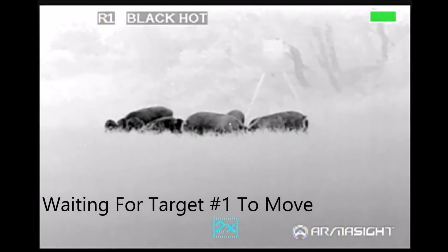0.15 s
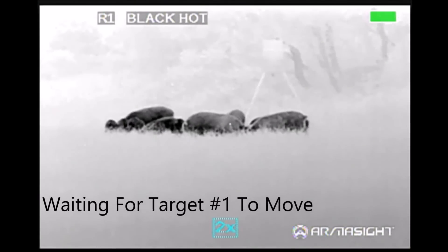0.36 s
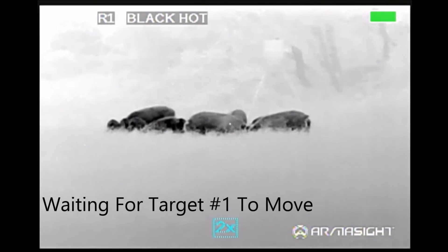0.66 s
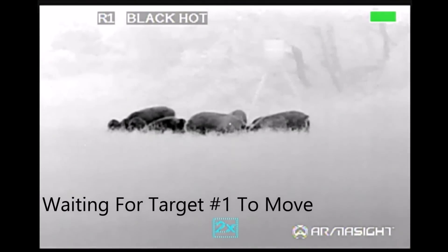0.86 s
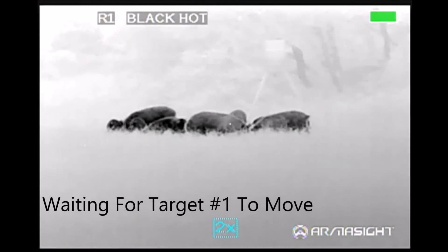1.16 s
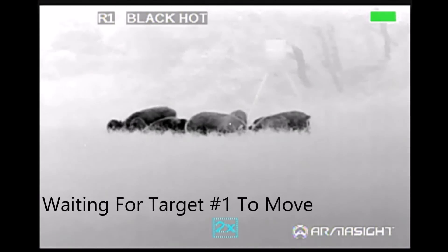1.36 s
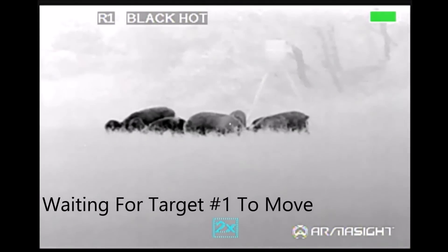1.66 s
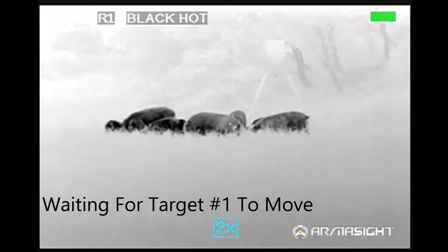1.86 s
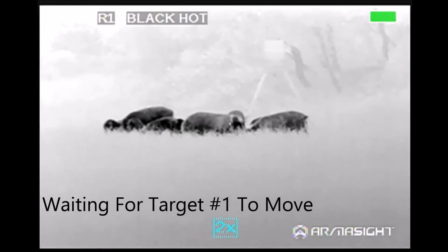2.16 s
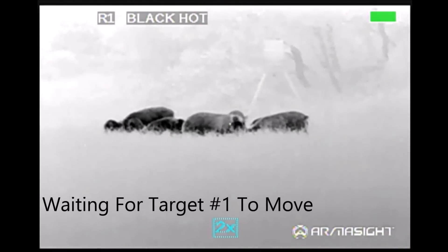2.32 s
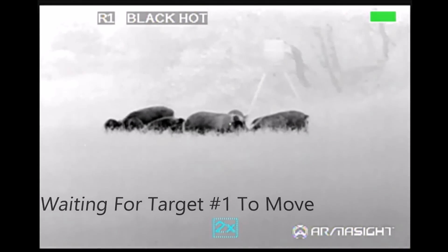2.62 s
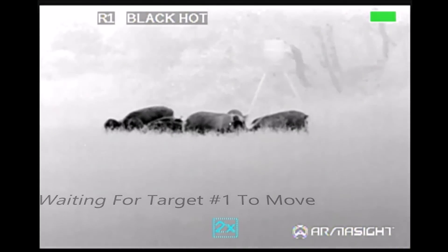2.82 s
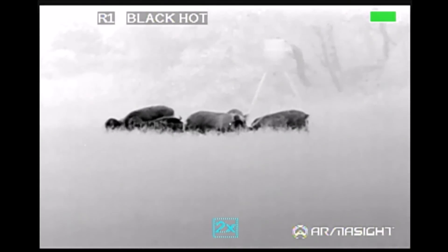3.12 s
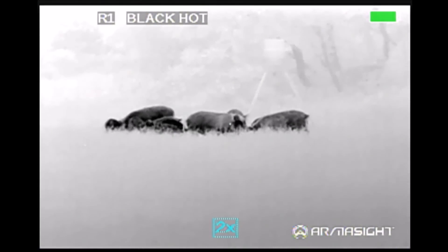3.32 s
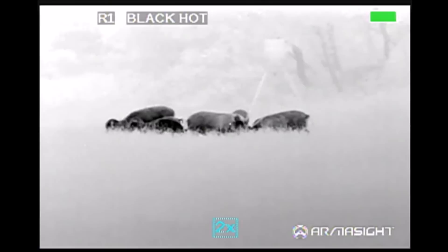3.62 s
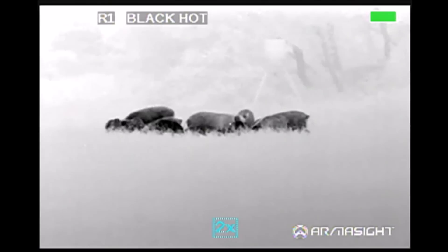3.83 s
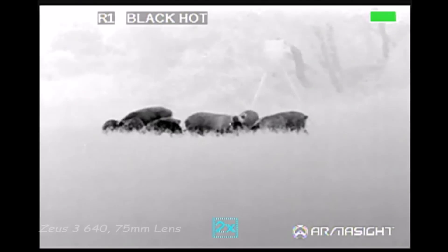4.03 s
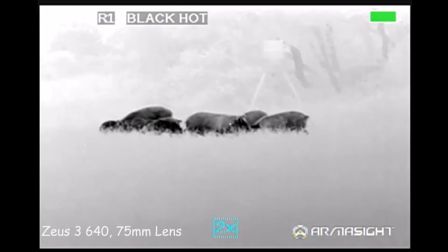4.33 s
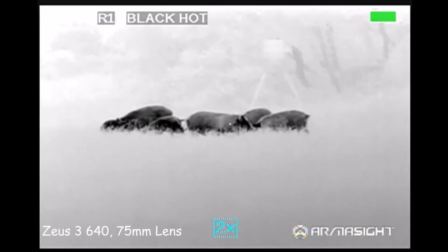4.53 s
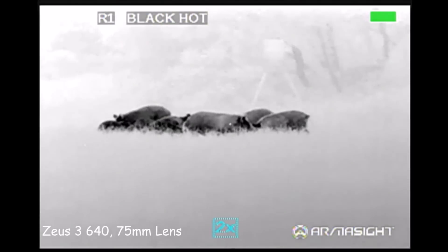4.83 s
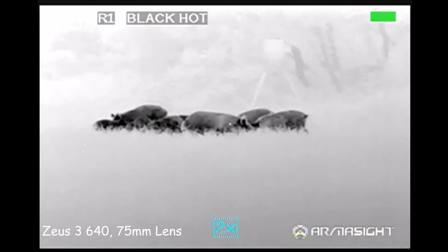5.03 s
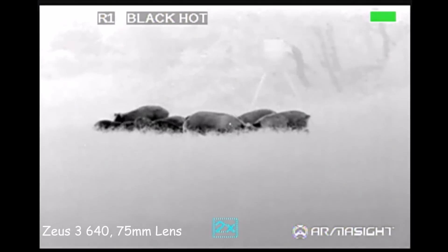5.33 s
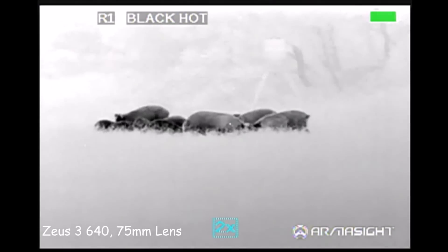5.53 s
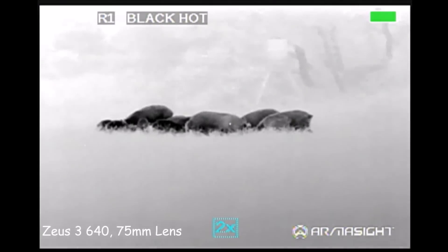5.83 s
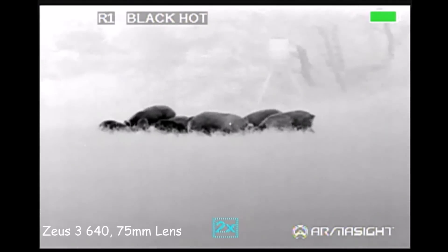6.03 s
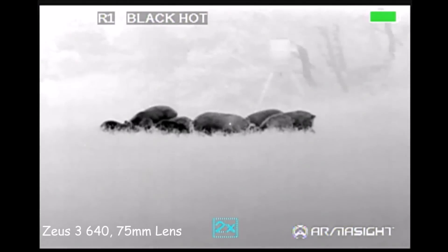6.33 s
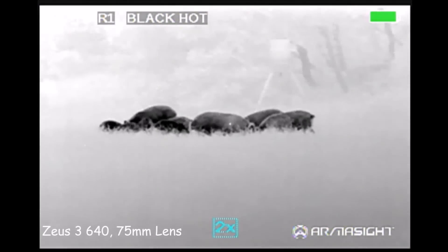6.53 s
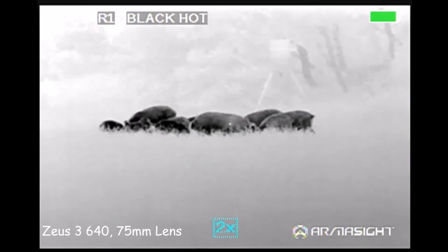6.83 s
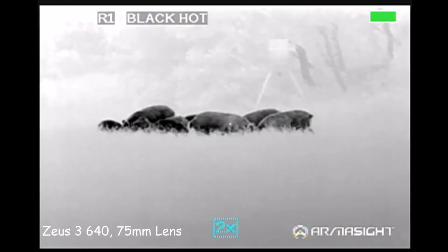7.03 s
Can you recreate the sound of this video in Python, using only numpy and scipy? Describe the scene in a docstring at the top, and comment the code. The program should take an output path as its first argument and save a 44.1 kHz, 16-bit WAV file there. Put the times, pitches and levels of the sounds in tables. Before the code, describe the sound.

High insect trills fill a field at night: a near cricket pulses in repeated bursts, a fainter one stutters behind it, and a lower one trills without a break. Low wind buffeting and a faraway engine hum run underneath with a light hiss. A faint rustle and tap come near the start, then a few soft clicks and knocks by the microphone midway, while the crickets carry on.

```python
"""Crickets sing at night in an open field: a tree cricket trills steadily, two ground crickets, one near
and one far, in broken trills. Each sings by stridulation: a scraper runs over a file of teeth and drives
a wing resonance. Wind buffets the microphone, far engines hum, and a few small taps and rustles fall
over the amplifier's hiss. The recorder ticks faintly as it loses samples."""
import sys
import numpy as np
from scipy import signal
from scipy.fft import rfft, irfft
from scipy.io import wavfile
from scipy.ndimage import uniform_filter1d

SR = 44100
rng = np.random.default_rng(int(sys.argv[2]) if len(sys.argv) > 2 else 0)


def file_out(sig):
    """Save sig as 16-bit WAV at sys.argv[1]."""
    # one column per channel
    cols = np.atleast_2d(sig).T
    # limit, then scale
    lim = np.clip(cols, -1, 1)
    pcm = np.round(lim * 32767).astype(np.int16)
    wavfile.write(sys.argv[1], SR, pcm)


N = 316197


def gain_of(db):
    """Amplitude ratio of a level in decibels."""
    return 10 ** (np.asarray(db) / 20)


def unit_rms(x):
    """Normalisation to a mean power of 1."""
    return x / np.sqrt(np.mean(abs(x) ** 2) + 1e-20)


def curves(rows):
    """Linear interpolation of a time table's columns, sample by sample."""
    times, *columns = np.transpose(rows)
    return [np.interp(np.arange(N) / SR, times, column) for column in columns]


def coloured_noise(spectrum):
    """Spectral shaping of white noise, rms 1."""
    corner_hz, db = np.transpose(spectrum)
    hz = np.fft.rfftfreq(N, 1 / SR)
    shape = gain_of(np.interp(np.log(hz + 1), np.log(corner_hz + 1), db, right=-120))
    return unit_rms(irfft(rfft(rng.standard_normal(N)) * shape, N))


def wander(width_hz):
    """Slow random modulation: complex noise with a Gaussian spectrum, rms 1."""
    hz = np.fft.fftfreq(N, 1 / SR)
    return unit_rms(np.fft.ifft(np.exp(2j * np.pi * rng.random(N) - 2 * (hz / width_hz) ** 2)))


def add(mix, start_s, sound):
    """Superposition of a sound on the mix, cut to fit."""
    at = round(start_s * SR)
    part = mix[max(at, 0):][:len(sound) + min(at, 0)]
    part += sound[max(-at, 0):][:len(part)]


def hiss():
    """Broadband noise of the amplifier and rumble of far air, with slight amplitude modulation."""
    # noise spectrum: frequency_hz, relative_density_db
    spectrum = [(30, 2), (60, 9.5), (110, 6.5), (190, -1), (330, -2.5), (700, -8), (1500, -12), (2700, -15),
                (5600, -17), (9800, -19.5), (10500, -23.5), (11200, -48)]
    return gain_of(-41 + 1.04 * wander(54).real) * coloured_noise(spectrum)


def engines():
    """Far tones whose phase and amplitude drift as they propagate through the air."""
    # two strongest tones: time_s, lower_level_db, upper_level_db
    hum_levels = [(0.0, -51, -48), (0.18, -57, -44.5), (0.68, -46.5, -62), (0.96, -61, -55),
                  (1.14, -40, -43.5), (1.76, -45, -45), (2.0, -47, -38.5), (2.21, -51, -54),
                  (2.66, -38, -44.5), (2.91, -50, -54), (3.15, -41, -67), (3.51, -46, -43),
                  (3.75, -35, -47), (3.93, -44.5, -46), (4.47, -42, -40), (6.07, -46, -41.5),
                  (7.05, -48, -58), (7.17, -61, -56)]
    # weaker narrowband tones: pitch_hz, width_hz, level_db
    drone_bands = [(40.4, 2.1, -48), (69.3, 1.5, -60), (76, 3.9, -46), (108.5, 5.2, -57), (124, 2.3, -58.5),
                   (137.3, 2.2, -59), (140.7, 0.79, -56), (164, 2.2, -59.5)]
    t = np.arange(N) / SR
    hum = sum(gain_of(db) * np.sqrt(2) * np.sin(2 * np.pi * hz * t + 0.89 * wander(0.81).real)
              for hz, db in zip((73, 82.8), curves(hum_levels)))
    drones = sum(gain_of(db) * np.sqrt(2) * (wander(width_hz) * np.exp(2j * np.pi * hz * t)).real
                 for hz, width_hz, db in drone_bands)
    return hum + drones


def wind():
    """Low-frequency pressure fluctuations on the microphone, swelling in gusts."""
    # gust envelope: time_s, level_db
    gusts = [(0.0, -36.5), (0.3, -36), (0.5, -28.5), (1.72, -36.5), (1.78, -28.5), (2.6, -29),
             (2.85, -42.5), (3.24, -30.5), (3.3, -40), (4.13, -32.5), (4.47, -39.5), (5.45, -28.5),
             (5.47, -36), (6.15, -31), (6.23, -38.5), (7.17, -32.5)]
    # pressure spectrum: frequency_hz, relative_density_db
    buffet = [(2, -28), (6, -10.5), (12, -0.5), (30, -7.5), (55, -16.5), (80, -26.5), (150, -42.5)]
    flutter_db = 1.5 * wander(5.7).real
    return gain_of(curves(gusts)[0] + flutter_db) * coloured_noise(buffet)


def rustles():
    """Friction noise: brief soft brushes of cloth or grass."""
    # brushes: start_s, length_s, level_db
    brushes = [(0.315, .04, -45), (6.62, .08, -50)]
    out = np.zeros(N)
    noise = coloured_noise([(200, -20), (400, 6), (1000, 2), (3000, -14), (5000, -30)])
    for start_s, length_s, db in brushes:
        size = round(length_s * SR)
        add(out, start_s, gain_of(db) * np.hanning(size) * noise[round(start_s * SR):][:size])
    return out


def taps():
    """Damped oscillation: small dull knocks near the microphone, each ringing in one or a few modes."""
    # one row per mode, each with a soft onset: start_s, peak_db, pitch_hz, rise_s, t60_s
    modes = [(0.346, -41, 3290, .002, .05), (0.992, -35, 400, .002, .028), (3.2785, -32, 1220, .0006, .014),
             (3.457, -33.5, 1300, .0006, .014), (3.703, -35.5, 760, .006, .06),
             (3.708, -45, 910, .005, .05), (3.706, -43, 480, .005, .05), (3.780, -39.5, 550, .004, .04),
             (3.784, -45, 1150, .003, .04)]
    out, t = np.zeros(N), np.arange(SR // 8) / SR
    for start_s, db, hz, rise_s, t60_s in modes:
        envelope = gain_of(-60 * t / t60_s) * (1 - np.exp(-t / rise_s))
        add(out, start_s, gain_of(db) * envelope / envelope.max() * np.sin(2 * np.pi * hz * t))
    return out


def grass_scattering(song, t60_s=.1, tail_db=-13):
    """Scattering by grass and brush turns part of a song's power into a short diffuse tail."""
    t = np.arange(SR // 5) / SR
    response = rng.standard_normal(len(t)) * gain_of(-60 * t / t60_s)
    tail = unit_rms(signal.oaconvolve(song, response)[:N])
    return unit_rms(unit_rms(song) + gain_of(tail_db) * tail) * np.std(song)


def wing_stroke(start_hz, end_hz, bend, rise_s, fall_s, ring_hz, width_hz, direct_gain):
    """Forced resonance: ever slower tooth strikes drive the wing, which beats with them and rings on."""
    t = np.arange(-rise_s, fall_s + 0.019, 1 / SR)
    swell = np.cos(np.pi / 2 * np.clip(np.where(t < 0, -t / rise_s, t / fall_s), 0, 1))
    progress = np.clip((t + rise_s) / (rise_s + fall_s), 0, 1)
    tooth_hz = start_hz + (end_hz - start_hz) * progress ** bend
    drive = swell * np.exp(2j * np.pi * np.cumsum(tooth_hz) / SR)
    radius = np.exp(-np.pi * width_hz / SR)
    ring = signal.lfilter([1 - radius], [1, -radius * np.exp(2j * np.pi * ring_hz / SR)], drive)
    sound = ring + direct_gain * drive
    power = uniform_filter1d(abs(sound) ** 2, size=200)
    return sound * np.sqrt(2 / power.max()), power.argmax() / SR


def stridulation(times, levels, wing, spread_db, jitter_s, detune):
    """A pulse train of wing strokes, no two quite alike, the stronger gliding lower."""
    out = np.zeros(N)
    start_hz, end_hz, *shape = wing
    for time_s, db in zip(times, levels):
        louder, later, phase, start_shift, end_shift = rng.standard_normal(5)
        deeper = .003 * (db - np.mean(levels))
        sound, peak_s = wing_stroke(start_hz * (1 + detune * start_shift),
                                    end_hz * (1 + detune * end_shift - deeper), *shape)
        pulse = gain_of(db + spread_db * louder) * (sound * np.exp(10j * phase)).real
        add(out, time_s - peak_s + jitter_s * later, pulse)
    return out


def run_times(first_s, last_s, count, period_s, drag_power):
    """Nearly periodic strokes that drag towards the end; a higher power delays the drag."""
    k = np.arange(count)
    drag_s = last_s - first_s - period_s * k[-1]
    return first_s + period_s * k + drag_s * (k / k[-1]) ** drag_power


def far_cricket(wing, warmup_db=-6, brush_db=-10):
    """Stuttering stridulation: after a full stroke the scraper may only brush the file."""
    # trills: first_s, last_s, stroke_count, warmup_count, stutter_from_s, stutter_to_s, level_db
    trills = [(0.0054, 0.8636, 60, 0, 0, 0.18, -47.5), (1.052, 1.7672, 50, 7, 1.27, 1.46, -48.3),
              (1.908, 2.19, 21, 5, 0, 0, -50.2), (3.6271, 4.1007, 33, 0, 3.66, 3.94, -48.3),
              (4.2742, 4.6412, 26, 1, 4.29, 4.47, -47.3), (4.785, 5.4626, 48, 5, 4.97, 5.28, -47.5),
              (5.651, 6.2289, 41, 1, 5.92, 6.04, -47), (6.3412, 7.1531, 57, 1, 6.41, 6.64, -47)]
    times, levels = [], []
    for first_s, last_s, count, warmup, stutter_from_s, stutter_to_s, db in trills:
        brushed = True  # so the first stroke is never brushed
        for k, time_s in enumerate(run_times(first_s, last_s, count, period_s=.0141, drag_power=4)):
            chance = .7 if stutter_from_s < time_s < stutter_to_s else .13
            brushed = rng.random() < chance and not brushed
            times.append(time_s)
            levels.append(db + warmup_db * (k < warmup) + brush_db * brushed)
    return stridulation(times, levels, wing, spread_db=1.2, jitter_s=.0006, detune=.011)


def near_cricket(wing, pause_s=.0245, warmup_db=-10, swell_db=-4.5, brush_db=-12):
    """Stridulation in bursts: a lone stroke, a pause, weak warm-up strokes, then a swelling run."""
    # trills: opening_s, last_s, run_count, warmup_count, period_s, drag_power, opening_db, full_db
    trills = [(0.2065, 0.3951, 12, 1, .01385, 8, -43, -43), (0.7399, 1.2759, 37, 6, .01372, 8, -48, -41.5),
              (1.5388, 2.3413, 56, 1, .01385, 8, -47.5, -41.5),
              (2.5612, 3.2413, 47, 1, .01378, 8, -44.5, -41.5),
              (3.6894, 3.966, 19, 3, .01385, 8, -46, -41.5), (4.3785, 4.9403, 39, 5, .01385, 8, -48, -42),
              (5.1806, 6.037, 59, 2, .01383, 4, -45.5, -41),
              (6.2649, 7.0155, 53, 3, .0137, 4, -45.5, -41.5)]
    # strokes that only brush the file: time_s
    brush_times = [0.371, 0.889, 0.955, 1.618, 2.277, 2.291, 2.654, 3.113, 3.784, 3.852, 3.966, 5.62, 5.972]
    times, levels = [], []
    for opening_s, last_s, count, warmup, period_s, drag_power, opening_db, full_db in trills:
        k = np.arange(count)
        run_db = full_db + np.where(k < warmup, warmup_db, swell_db * ((count - k) / (count - warmup)) ** 2)
        times += [opening_s, *run_times(opening_s + pause_s, last_s, count, period_s, drag_power)]
        levels += [opening_db, *run_db]
    times, levels = np.array(times), np.array(levels)
    brushed = abs(times[:, None] - brush_times).argmin(0)
    levels[brushed] += brush_db
    return stridulation(times, levels, wing, spread_db=1.3, jitter_s=.0006, detune=.006)


def tree_cricket(wing, level_db=-49):
    """Continuous stridulation: one unbroken trill at a nearly constant pulse rate."""
    # pace of the trill: time_s, cumulative_stroke_count
    pace = [(0.0035, 0), (5.203, 216), (5.481, 227), (6.3289, 262), (7.1691, 297)]
    marks_s, counts = np.transpose(pace)
    times = np.interp(np.arange(counts[-1] + 1), counts, marks_s)
    levels = np.full(len(times), level_db)
    return stridulation(times, levels, wing, spread_db=.7, jitter_s=.0004, detune=.004)


def crickets():
    """Three singers in the grass, each pitched by its own tooth rate and wing resonance."""
    # tooth-rate glide, envelope and resonance of each wing:
    # start_hz, end_hz, bend_power, rise_s, fall_s, ring_hz, width_hz, direct_gain
    tree_wing = (3730, 3275, .66, .0054, .0077, 3350, 110, .15)
    near_wing = (5230, 4580, .72, .0071, .0051, 4940, 48, .3)
    far_wing = (5530, 4880, .72, .0071, .0051, 5210, 75, .27)
    songs = tree_cricket(tree_wing), near_cricket(near_wing), far_cricket(far_wing)
    return sum(grass_scattering(song) for song in songs)


def scene():
    """Superposition of all sources in one channel."""
    return (crickets() + wind() + engines() + hiss() + taps() + rustles())[None]


def record(dry, first_s=-.38065, step_s=.066757, cycle_s=.567376, cutoff_hz=15900):
    """Discontinuities tick: lost samples pull the wave to zero for an instant; a low-pass follows."""
    # chance of a lost sample at each of eight even steps in a cycle: probability
    loss_chance = [.45, .95, .95, .9, .8, .65, .45, .15]
    cycles_s = np.arange(0, N / SR + 1, cycle_s)
    times = first_s + np.add.outer(cycles_s, step_s * np.arange(len(loss_chance)))
    times = times[(rng.random(times.shape) < loss_chance) & (times > 0) & (times < (N - 1) / SR)]
    lost = np.zeros(N)
    lost[np.round(times * SR).astype(int)] = 1
    ticking = dry * (1 - np.convolve(lost, [.5, 1, .5], "same"))
    lowpass = signal.firwin(511, cutoff_hz, window=("kaiser", 9), fs=SR)
    return signal.oaconvolve(ticking, lowpass[None], "same")


dry = scene()
out = record(dry)
file_out(out)
```